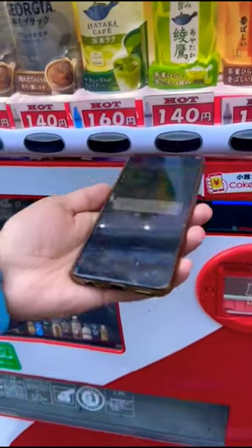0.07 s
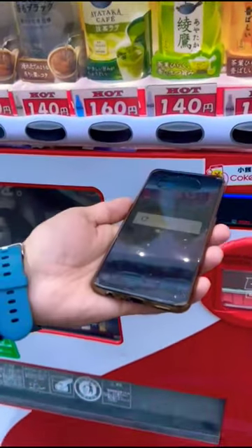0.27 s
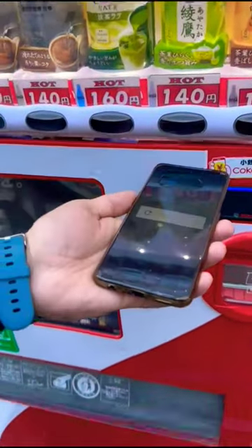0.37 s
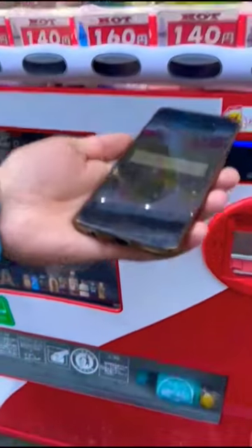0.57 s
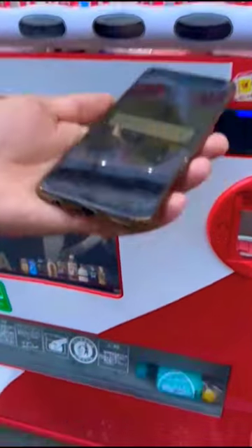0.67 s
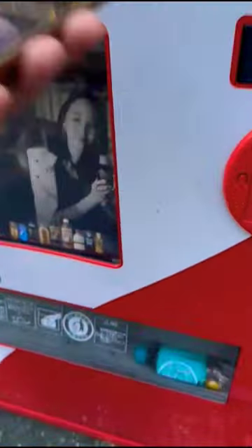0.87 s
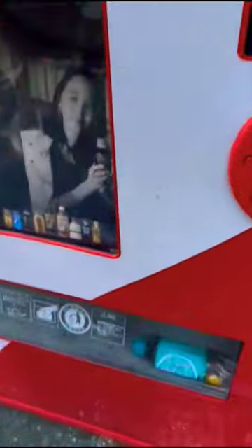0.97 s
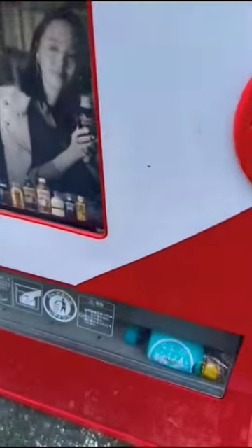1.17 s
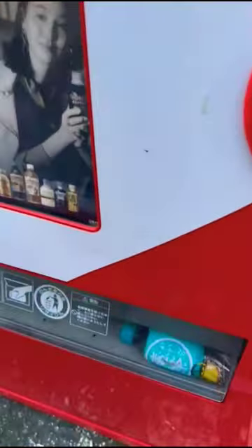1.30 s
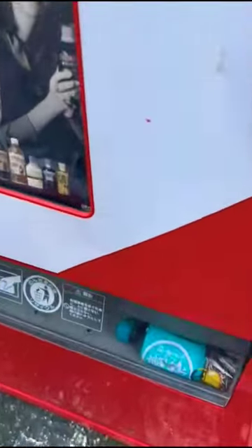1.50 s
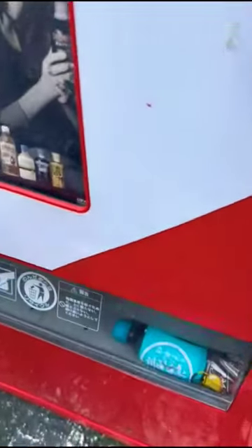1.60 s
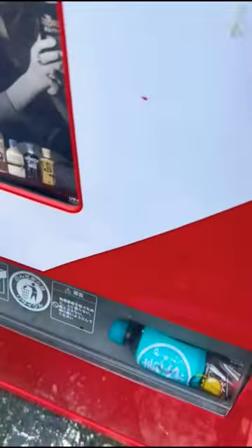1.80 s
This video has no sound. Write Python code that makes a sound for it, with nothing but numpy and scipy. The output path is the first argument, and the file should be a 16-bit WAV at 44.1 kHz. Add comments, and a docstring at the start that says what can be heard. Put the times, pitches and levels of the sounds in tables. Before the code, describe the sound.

A plastic bottle thumps and clatters into a vending machine's steel slot over a low hum.

```python
"""A vending machine's gate shuffles over a compressor hum and low outdoor noise; then a full plastic
bottle thumps onto the chute, slides, tumbles and knocks to rest in the steel delivery slot.
Its weight makes the hollow cabinet boom; each contact rattles the panels and cracks the plastic shell.
Outdoors, on a phone's two microphones about a metre from the machine, with the slot to the right."""
import sys
import numpy as np
from scipy import signal
from scipy.fft import rfft, irfft
from scipy.io import wavfile
from scipy.ndimage import uniform_filter1d

SR = 44100
rng = np.random.default_rng(int(sys.argv[2]) if len(sys.argv) > 2 else 0)


def wav_record(signal):
    """Record a signal, one row per channel, as 16-bit PCM in the file named by sys.argv[1]."""
    frames = np.transpose(np.atleast_2d(signal))
    bounded = np.clip(frames, -1, 1)
    # unit amplitude maps onto the largest positive 16-bit level
    quanta = np.round(bounded * 32767).astype(np.int16)
    wavfile.write(sys.argv[1], SR, quanta)


N = 81585
T = np.arange(N) / SR
F = np.maximum(np.arange(N + 1) * SR / (2 * N), 1)  # f/Hz of a spectrum padded to 2 N

# spectrum of the outdoor background (f/Hz, relative level/dB)
OUTDOOR_COLOUR = [(20, -52), (35, -8.5), (60, 0.5), (110, -3), (160, -9), (230, -18.5), (400, -19),
                  (780, -23.5), (1200, -32), (2300, -40.5), (4300, -48.5), (6500, -52.5), (9000, -56),
                  (11000, -59)]
# course of the whole background (t/s, level/dB)
OUTDOOR_SWELL = [(0, -30), (.4, -31), (1.12, -28), (1.35, -29.5), (1.5, -29), (1.58, -27.5), (1.69, -27.5),
                 (1.76, -28), (1.85, -29.5)]
# its low middle range thins out, probably from the phone's noise suppressor (t/s, relative level/dB)
MIDRANGE_THINNING = [(0, 3.5), (1.0, 0), (1.2, 0), (1.36, -1.5), (1.5, -4), (1.58, -2), (1.72, 0),
                     (1.85, 0)]
# compressor and fan lines (f/Hz, level/dB)
HUM_LINES = [(95, -36.5), (371, -46), (780, -49)]
# rubbing of the gate, then of the sliding bottle (t/s, length/s, panel level/dB, plastic level/dB)
RUBS = [(0, 0.13, -41.5, -53), (0.05, 0.041, -49, -56.5), (0.161, 0.12, -28, -46.5),
        (0.3, 0.081, -37.5, -60), (0.371, 0.086, -34, -45.5), (0.414, 0.039, -18.5, -29),
        (0.437, 0.056, -26, -30.5), (0.55, 0.12, -29, -40), (0.659, 0.17, -28.5, -39)]
# the bottle hits chute and flap (t/s, panel level/dB, plastic level/dB, plastic decay/s)
BOTTLE_KNOCKS = [(0.4326, -33, -26.5, 0.014), (0.446, -31, -16.5, 0.0097), (0.4497, -9, -21, 0.011),
                 (.4595, -22, -38, .005), (0.465, -20, -40, 0.0087), (.475, -16.5, -42, 0.011),
                 (.506, -37, -25.5, 0.014), (0.5096, -36, -20.5, 0.027), (0.522, -25, -19.5, .008),
                 (0.531, -16.5, -19, 0.018), (0.5399, -15, -15, 0.0043), (.544, -14.5, -20.5, 0.0074),
                 (0.557, -16, -28.5, 0.012), (0.5585, -24, -33.5, 0.008), (0.585, -24.5, -34.5, 0.011),
                 (0.621, -39, -31, .007), (0.6286, -36, -31.5, 0.015), (0.64, -43, -26, .004),
                 (0.644, -23.5, -29.5, 0.014), (.67, -40, -30.5, 0.01), (0.6997, -22, -24, 0.007),
                 (0.7044, -19.5, -21, 0.0072), (0.707, -16.5, -24, .011), (.719, -20, -34, 0.01),
                 (0.747, -21, -37, .006), (0.777, -37, -33, 0.011), (0.7924, -36, -28.5, 0.011),
                 (0.804, -23.5, -30, 0.01), (0.8214, -21.5, -44, 0.0044), (.851, -31, -58, 0.011)]
# small ticks as things settle (t/s, panel level/dB, plastic level/dB, plastic decay/s)
SETTLING_TICKS = [(0.895, -38.5, -52, 0.0098), (0.943, -35.5, -46.5, 0.0082), (.953, -35.5, -51.5, 0.013),
                  (0.982, -32.5, -69, 0.0078), (1.278, -41, -54.5, 0.0078), (1.438, -58, -52, 0.0044),
                  (1.661, -48, -51, .004), (1.824, -58, -43.5, 0.0027)]
# spectrum of clattering steel (f/Hz, relative level/dB)
CLATTER_COLOUR = [(40, -22.5), (130, 10), (230, 10), (400, 2.5), (560, 0.5), (750, -7.5), (1000, -6.5),
                  (1300, -12), (2300, -14), (2800, -16), (3300, -18), (4300, -27.5), (7000, -25.5),
                  (12000, -39)]
# spectrum of cracking plastic (f/Hz, relative level/dB)
CRACK_COLOUR = [(100, -20), (1500, -0.5), (3000, -2.5), (4500, -5), (6200, -2.5), (7500, -2.5),
                (9000, -6.5), (9700, -6.5), (11300, -10.5)]
# steel panel resonances, lowest first (f/Hz, relative level/dB)
PANEL_MODES = [(211, 0.5), (238, -4.5), (310, -6.5), (372, -1.5), (478, -4.5), (515, -8.5), (594, -4),
               (692, -14), (740, -18), (830, -10.5), (938, -7.5), (1062, -10.5), (1160, -16.5), (1237, -14),
               (1551, -12), (1686, -14.5), (2116, -13), (2540, -20.5)]
# plastic shell resonances (f/Hz, relative level/dB, t60/s)
SHELL_MODES = [(3130, -20, 0.044), (4400, -17, 0.036), (6130, 3, 0.15), (6310, 9, 0.049),
               (6590, 12.5, 0.055), (6970, 4, 0.049), (8310, -12, 0.081), (8600, 1.5, 0.076)]
# heavy blows and soft bumps on the cabinet (t/s, level/dB, contact time/ms)
CABINET_BLOWS = [(0.106, -17.5, 5.2), (.212, -12.5, 6.6), (0.426, -4, 1.78), (0.4374, -20, 7.5),
                 (0.4437, -17, 1.4), (0.4537, -22, 1.6), (0.512, -19.5, 1.5), (0.669, -15.5, 3.66),
                 (0.7174, -19.5, 1.85), (0.823, -18.5, 1.24), (1.066, -17, 6.5), (1.112, -23, 5.8),
                 (1.564, -16, 7.1), (1.776, -15.5, 7.3)]
# low modes of the hollow cabinet (f/Hz, gain/dB, t60/s)
CABINET_MODES = [(65, -8, 0.13), (102, 1.5, .11), (177, 4.5, 0.038), (210.4, -5.5, 0.16),
                 (237.8, -8.5, .15), (306, -9, 0.087)]
# short rings and squeaks of bottle and flap (t/s, f/Hz, level/dB, decay/s)
SQUEAKS = [(.619, 9060, -34.5, 0.03), (0.635, 3650, -30, 0.015), (0.81, 2160, -32, 0.0037),
           (1.055, 5230, -51, 0.011), (1.278, 3520, -50, 0.0078), (1.439, 3530, -52, .008),
           (1.657, 2270, -44, 0.014), (1.66, 554, -40.5, 0.0082)]
# the slot lies to the right of the phone (f/Hz, left minus right level/dB)
SLOT_BALANCE = [(60, -3.5), (200, 1), (350, -3), (600, -9.5), (820, -10.5), (1100, -7.5), (1550, -0.5),
                (2500, 2), (3200, 1), (11000, -0.5)]
# phase between the microphones, for slot and background (f/Hz, left lead/rad)
SLOT_LEAD = [(20, 0), (250, -.25), (700, -1.4), (1000, -5.5), (1400, -6.3), (2400, -6.6), (2700, -9),
             (3600, -6.5), (4250, -6.3), (4700, -9.3), (4950, -9.6), (5250, -12.5), (7800, -12.6),
             (11000, -15.4)]
AIR_LEAD = [(20, 0), (90, -1.1), (260, -2.4), (700, -3.1), (1300, -3.7), (1750, -6.2), (2300, -6.4),
            (2700, -9.8), (4100, -12.5), (4800, -15.7), (5400, -18.8), (7900, -18.9), (11000, -22)]
# likeness of the two microphone signals, for slot and background (f/Hz, coherence/0-1)
SLOT_COHERENCE = [(300, 1), (600, 1), (850, 0.28), (1800, 0.96), (2900, 0.43), (3900, 0.35), (4400, 0.3),
                  (4800, 0.89), (6500, 1), (7800, 0.77), (8500, 1)]
AIR_COHERENCE = [(80, 0.99), (250, 0.36), (450, 0.56), (800, 0.65), (1500, 0.086), (4000, 0.22), (5800, 1),
                 (7800, 0.97), (9000, 1)]


def undb(db):
    """Decibels to gain."""
    return 10 ** (np.asarray(db) / 20)


def unit(x):
    """Scale a response to unit energy."""
    return x / np.sqrt(np.sum(x ** 2))


def noise():
    """White noise."""
    return rng.standard_normal(N)


def walk(per_s):
    """Smooth random wander with a spread of 1."""
    width = max(int(SR / per_s), 2)
    wander = uniform_filter1d(noise(), width, mode="wrap")
    wander = uniform_filter1d(wander, width, mode="wrap")
    return wander / wander.std()


def over_hz(points):
    """Join (f/Hz, value) points on a log-frequency axis."""
    hz, value = np.array(points, float).T
    return np.interp(np.log(F), np.log(hz), value)


def fader(points):
    """Gain that follows (t/s, level/dB) points."""
    return undb(np.interp(T, *np.array(points).T))


def through(x, response):
    """Pass a sound through an impulse response."""
    return signal.fftconvolve(x, response)[:N]


def colour(x, points):
    """Minimum-phase filter with the given spectral shape and unit power gain."""
    cepstrum = irfft(np.log(undb(over_hz(points))))
    cepstrum[1:N] *= 2
    cepstrum[N:] = 0
    response = irfft(np.exp(rfft(cepstrum)))[:N]
    return through(x, unit(response))


def fade(t60):
    """A decay of 60 dB in t60 seconds."""
    return np.exp(-np.log(1000) * T / t60)


def ring(hz, t60):
    """One struck mode."""
    return np.sin(2 * np.pi * hz * T) * fade(t60)


def burst(start, attack, length, decay):
    """Envelope that rises at start and begins to die away length seconds later."""
    return np.clip((T - start) / attack, 0, 1) * np.exp(-np.maximum(T - start - length, 0) / decay)


def outdoors(flicker_db=3.8):
    """Low noise all around swells gently. Its low middle range thins out and flickers in narrow
    bands, probably from the phone's noise suppressor."""
    spectrum = rfft(colour(noise(), OUTDOOR_COLOUR), 2 * N)
    edges_hz = 200 * 2 ** (np.arange(12) / 4)
    band = np.digitize(F, edges_hz)
    low, *middle, high = [irfft(spectrum * (band == k))[:N] for k in range(band.max() + 1)]
    flickering = sum(part * undb(flicker_db * walk(per_s=13)) for part in middle)
    return fader(OUTDOOR_SWELL) * (low + high + fader(MIDRANGE_THINNING) * flickering)


def compressor(drift=0.0188, waver_db=6):
    """Compressor and fan hum: the lines drift together in pitch and waver separately in level."""
    clock = np.cumsum(1 + drift * walk(per_s=13.4)) / SR
    hum = 0
    for hz, db in HUM_LINES:
        rms = undb(db + waver_db * walk(per_s=32))
        hum = hum + np.sqrt(2) * rms * np.sin(2 * np.pi * hz * clock)
    return hum


def contact(surface, linger=1, knock_rise_s=0.0017, stutter_s=0.003, grain_s=0.0006):
    """Grainy force of stuttering rubs, knocks and ticks; linger stretches the knock and tick decays."""
    column = ("panel", "plastic").index(surface)
    rub_power = hit_power = 0
    for start, length, *levels in RUBS:
        envelope = burst(start, attack=0.016, length=length, decay=0.018)
        rub_power += (undb(levels[column]) * envelope) ** 2
    for start, *levels, decay in BOTTLE_KNOCKS + SETTLING_TICKS:
        envelope = burst(start, knock_rise_s, knock_rise_s, decay * linger)
        hit_power += (undb(levels[column]) * envelope) ** 2
    stutter = undb(db=2.2 * walk(1 / stutter_s)) ** 2
    grains = noise() * undb(db=1.8 * walk(1 / grain_s))
    return np.sqrt(hit_power + rub_power * stutter / stutter.mean()) * grains / grains.std()


def panels(force, bend=0.007, scatter_db=2.5, tumble_per_s=14, lowest_t60_s=0.45):
    """Steel resonances shift in strength and pitch as the bottle loads them at changing places."""
    lowest_hz = PANEL_MODES[0][0]
    steel = 0
    for hz, db in PANEL_MODES:
        t60 = lowest_t60_s * (lowest_hz / hz) ** 0.35  # higher modes die sooner
        coupling = undb(scatter_db * walk(tumble_per_s))
        coupling /= np.sqrt(np.mean(coupling ** 2))
        tone = through(force * coupling, unit(ring(hz, t60)))
        bent_time = T + bend / tumble_per_s * walk(tumble_per_s)
        steel = steel + undb(db) * np.interp(bent_time, T, tone)
    return steel / np.sqrt(sum(undb(db) ** 2 for hz, db in PANEL_MODES))


def shell(crack):
    """The bottle's plastic shell rings in the treble at each crack."""
    response = sum(undb(db) * unit(ring(hz, t60)) for hz, db, t60 in SHELL_MODES)
    return through(crack, unit(response))


def gate_and_bottle(slot_db=-10.5, panel_db=-7.5, shell_db=-19):
    """Gate and bottle rattle the steel and crack the plastic; the slot adds a short reverberation."""
    force = contact("panel", linger=1.71)
    crack = colour(contact("plastic"), CRACK_COLOUR)
    direct = colour(force, CLATTER_COLOUR) + crack
    slot = through(direct, unit(noise() * fade(t60=0.17)))
    return direct + undb(slot_db) * slot + undb(panel_db) * panels(force) + undb(shell_db) * shell(crack)


def cabinet(panel_db=-2):
    """The bottle's weight pushes the low modes of the hollow cabinet and sets its panels ringing."""
    push = 0
    for start, db, contact_ms in CABINET_BLOWS:
        half_sine = np.sin(np.pi * np.clip((T - start) * 1000 / contact_ms, 0, 1))
        push = push + undb(db) * half_sine / half_sine.sum()
    boom = sum(undb(db) * ring(hz, t60) for hz, db, t60 in CABINET_MODES)
    return through(push, boom) + undb(panel_db) * panels(push)


def squeaks(relative_width=0.05, rise_s=0.0054):
    """Bottle and flap ring and squeak briefly: each is noise through one narrow resonance."""
    sound = 0
    for start, hz, db, decay in SQUEAKS:
        t60 = np.log(1000) / (np.pi * relative_width * hz)
        tone = through(noise(), unit(ring(hz, t60)))
        sound = sound + undb(db) * burst(start, rise_s, rise_s, decay) * tone
    return sound


def microphones(mid, side, coherence, lead, balance_db=0):
    """Spread two unrelated versions of a sound, as mid and side, over the two microphones."""
    likeness = np.clip(over_hz(coherence), 0, 1)
    common = rfft(mid, 2 * N) * np.sqrt((1 + likeness) / 2)
    apart = rfft(side, 2 * N) * np.sqrt((1 - likeness) / 2)
    left = (common + apart) * undb(balance_db / 2) * np.exp(1j * over_hz(lead))
    right = (common - apart) * undb(-balance_db / 2)
    return irfft(np.array([left, right]))[:, :N]


def scene():
    """A metre from the machine: the delivery slot to the right, the background all around."""
    drop_mid = gate_and_bottle() + cabinet() + squeaks()
    drop_side = gate_and_bottle() + squeaks()
    drop = microphones(drop_mid, drop_side, SLOT_COHERENCE, SLOT_LEAD, over_hz(SLOT_BALANCE))
    background = microphones(outdoors() + compressor(), outdoors(), AIR_COHERENCE, AIR_LEAD)
    return drop + background


def record(dry, low_cut_hz=74, ceiling=1.1, top_hz=11300):
    """The phone drops the deepest bass, rounds the loudest peaks and cuts the top."""
    low_cut = signal.butter(2, low_cut_hz, "high", fs=SR, output="sos")
    top_cut = signal.ellip(10, 0.2, 80, top_hz, fs=SR, output="sos")
    rounded = ceiling * np.tanh(signal.sosfilt(low_cut, dry) / ceiling)
    return signal.sosfilt(top_cut, rounded)


dry = scene()
out = record(dry)
wav_record(out)
```